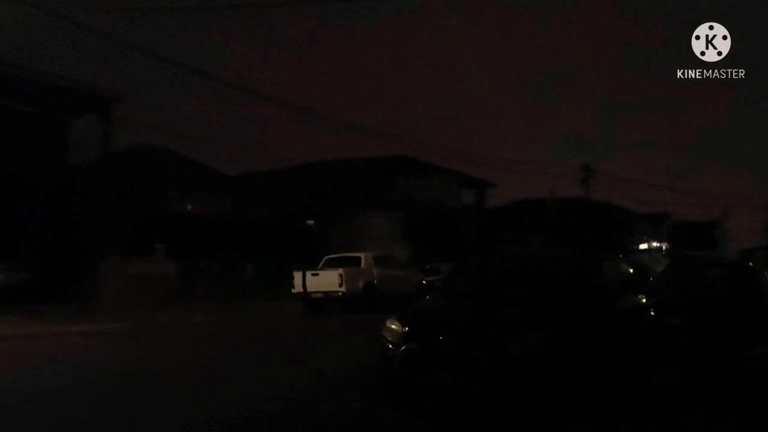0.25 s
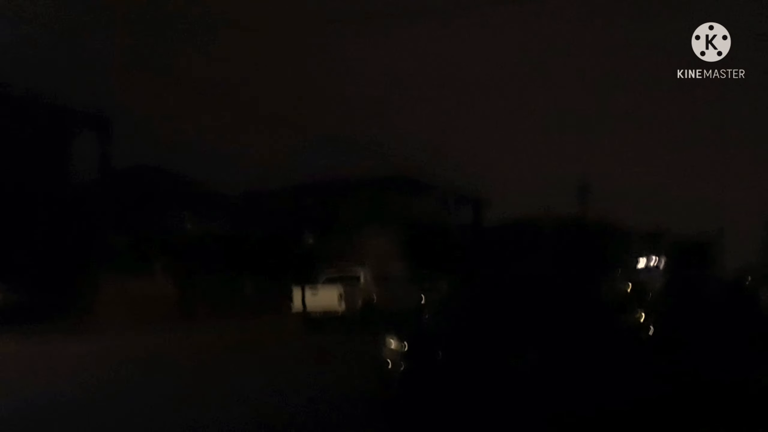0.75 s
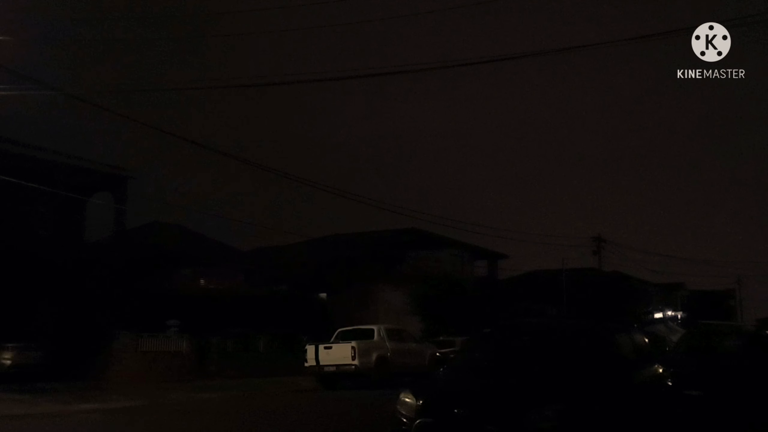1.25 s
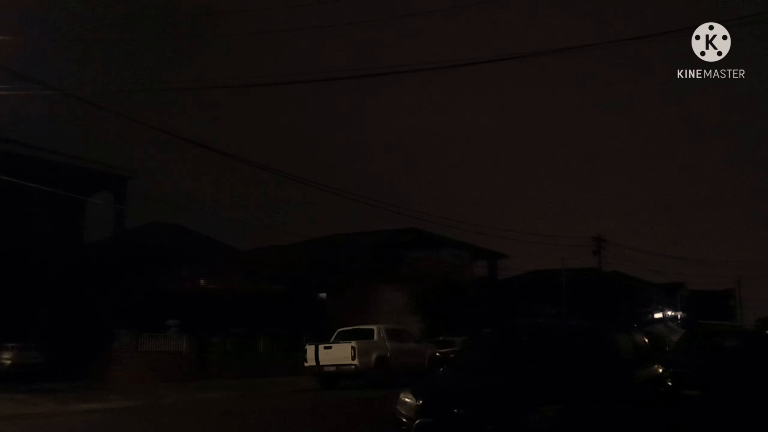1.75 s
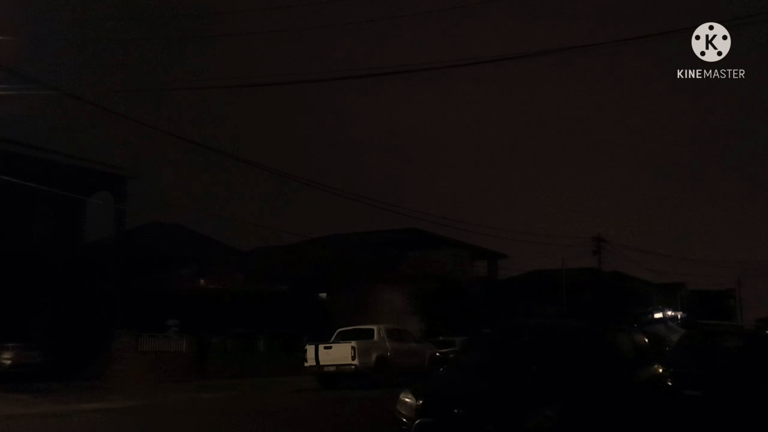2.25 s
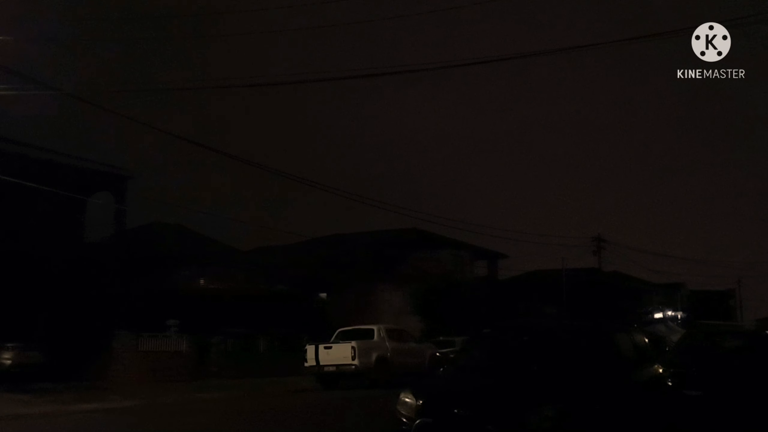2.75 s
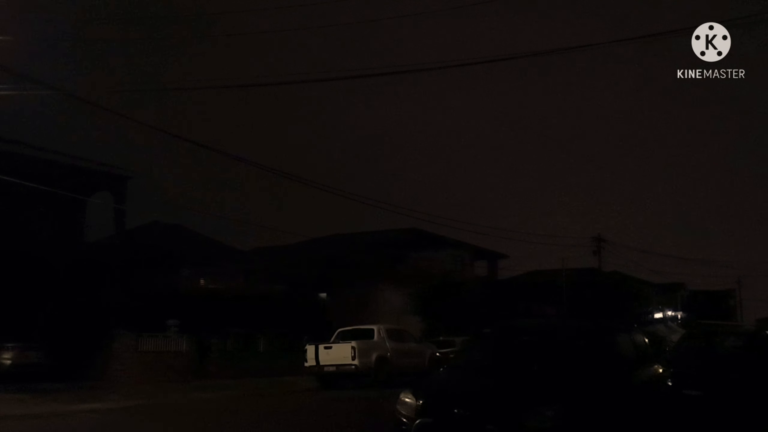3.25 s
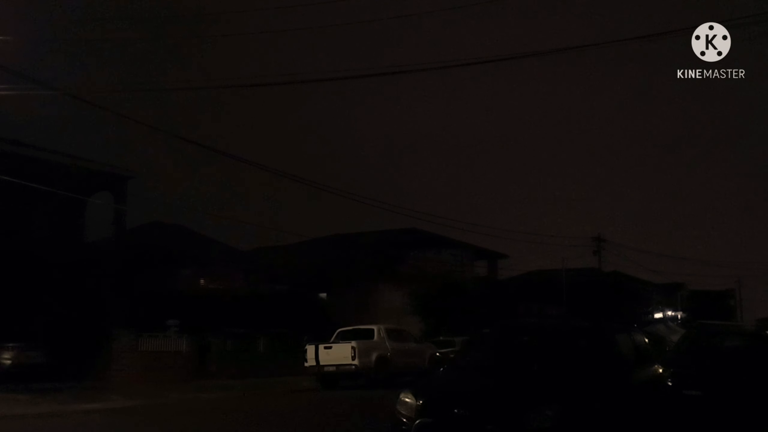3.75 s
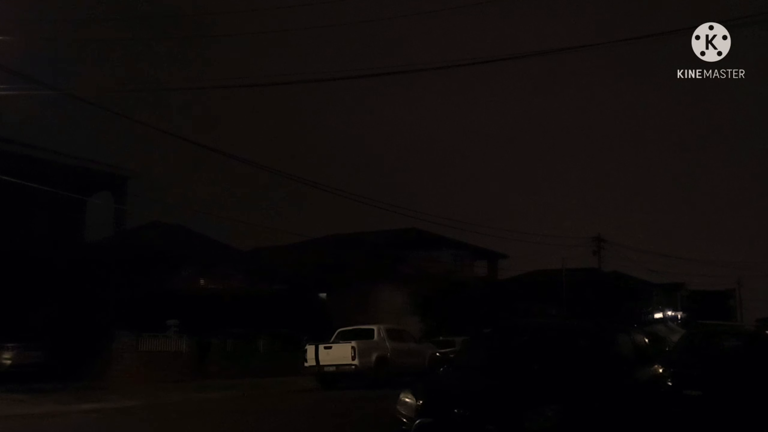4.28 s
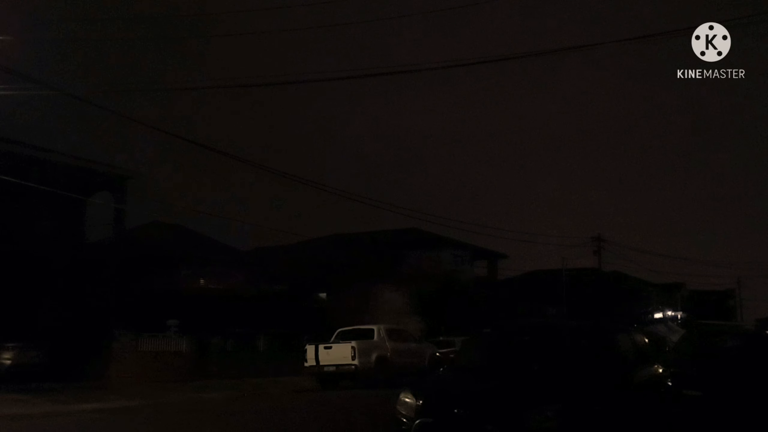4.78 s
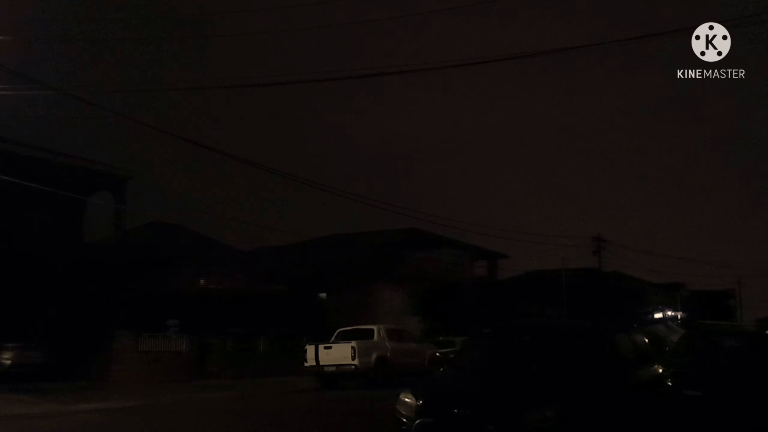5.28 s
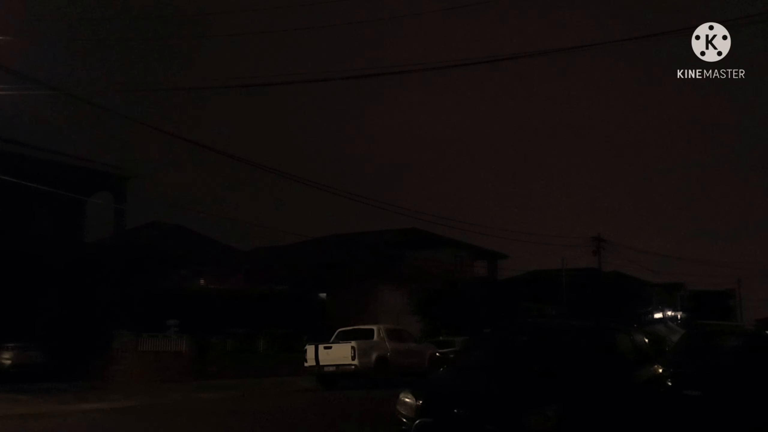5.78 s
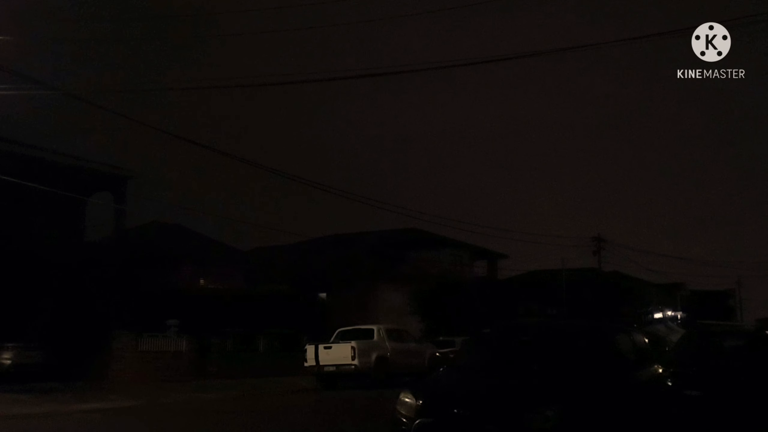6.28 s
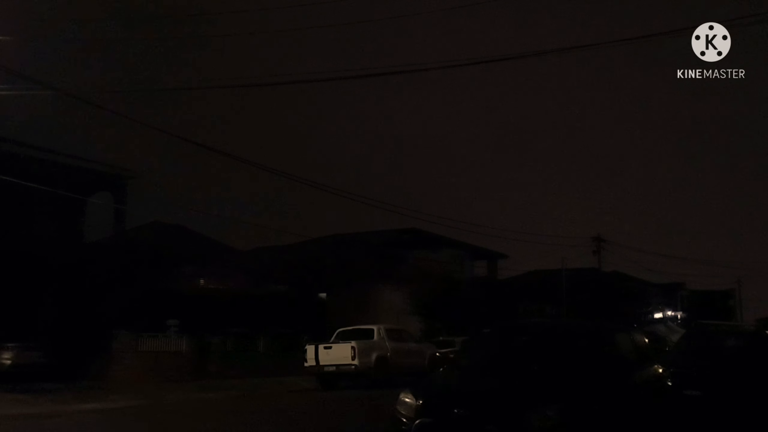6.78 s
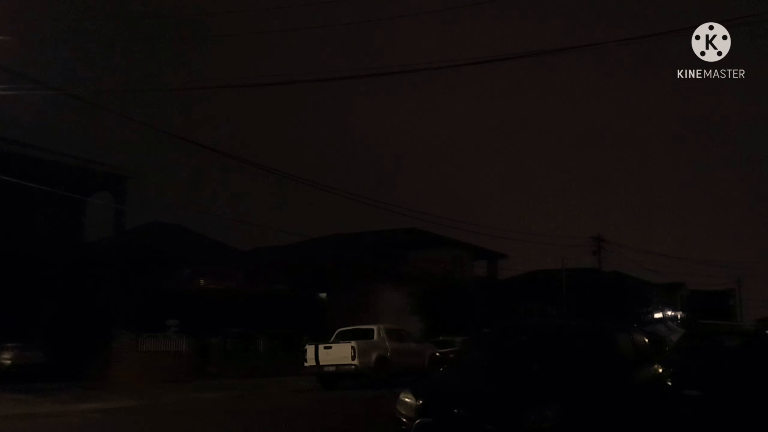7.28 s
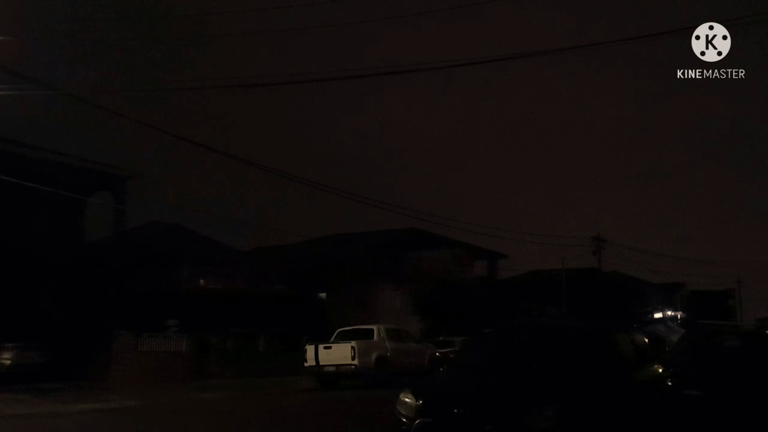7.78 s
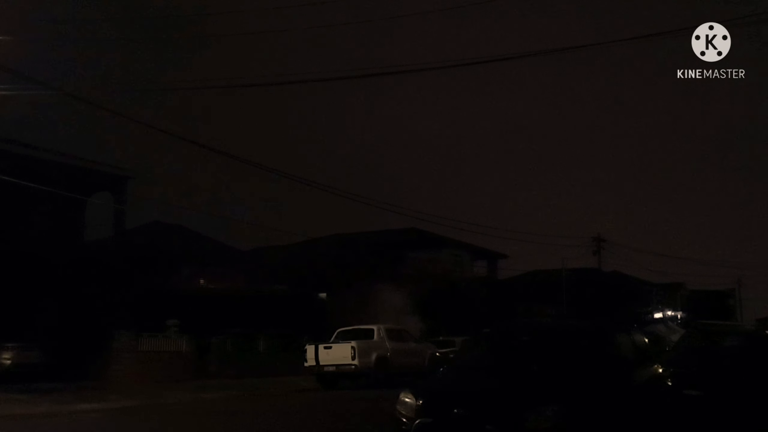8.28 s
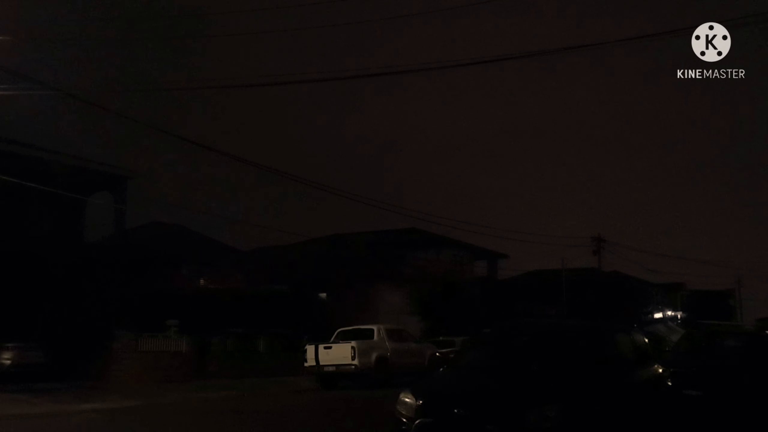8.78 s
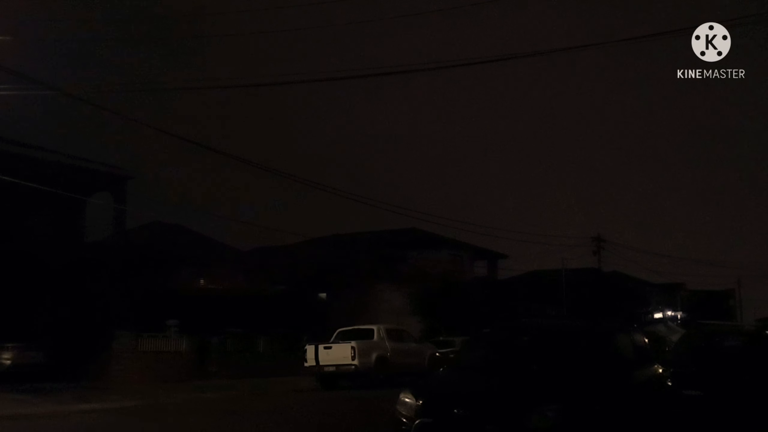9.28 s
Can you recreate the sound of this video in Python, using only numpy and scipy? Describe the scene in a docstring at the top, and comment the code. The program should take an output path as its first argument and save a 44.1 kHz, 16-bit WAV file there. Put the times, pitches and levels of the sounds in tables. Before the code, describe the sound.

Rain knocks and patters on a parked car's roof and glass, heard from inside, as distant thunder swells, rumbles heavily and fades.

```python
"""Rain on a parked car at night, heard from inside: large drops ring the panels of roof and windscreen, small
ones patter between them, and the cabin throws each knock back. Far thunder is shaped noise that swells, claps
and sets the cabin air booming near 300 Hz; dull blows ring that air too. Outside, finer rain is a wide hiss
with short bright swishes, and a faint insect chirps early on. Patter and hiss step up after the first second."""
import sys
import numpy as np
from scipy import signal
from scipy.fft import rfft, irfft, next_fast_len
from scipy.io import wavfile
from scipy.ndimage import uniform_filter1d

SR = 44100
rng = np.random.default_rng(int(sys.argv[2]) if len(sys.argv) > 2 else 0)


def unload_audio(sound):
    """Save the sound as a 16-bit wav file, at the path given as the first command line argument."""
    columns = np.transpose(np.atleast_2d(sound))
    # keep every value between -1 and 1, then stretch to whole-number steps
    steps = np.round(np.clip(columns, -1, 1) * 32767)
    wavfile.write(sys.argv[1], SR, steps.astype(np.int16))


def boost_factor(decibels):
    """Convert a level in decibels to a linear amplitude factor."""
    exponent = np.asarray(decibels, float) / 20
    return 10 ** exponent


N = 420273  # samples

# large drops on the roof, dull: start_s, knock_level_db
ROOF_DROPS = [(0.014, -37), (0.0329, -25), (0.069, -39), (0.081, -30.5), (0.09, -35), (0.105, -37),
              (0.1335, -37), (0.148, -32), (0.192, -35), (0.213, -39), (0.378, -25), (0.447, -38),
              (0.518, -28.5), (0.6171, -30.5), (0.773, -37.5), (0.824, -38), (0.9668, -33), (0.9886, -28),
              (1.092, -34.5), (1.109, -32), (1.1237, -32), (1.158, -32), (1.178, -37), (1.325, -30.5),
              (1.3831, -26.5), (1.404, -35), (1.436, -27), (1.6982, -35), (1.9222, -17), (2.087, -13.5),
              (2.1338, -14), (2.1508, -23.5), (2.1697, -25), (2.303, -29.5), (2.467, -24.5), (2.4864, -24),
              (2.6024, -27), (2.8645, -23), (2.8706, -19.5), (3.113, -49), (3.1304, -26.5), (3.233, -18),
              (3.272, -29), (3.334, -30), (3.4739, -22.5), (3.546, -28.5), (3.61, -31.5), (3.6682, -18.5),
              (3.746, -28.5), (3.762, -26), (3.855, -24), (3.9263, -24), (4.023, -28.5), (4.04, -31),
              (4.063, -27), (4.098, -34), (4.134, -24.5), (4.429, -31), (4.443, -30), (4.6446, -25.5),
              (4.729, -26), (4.8813, -19.5), (5.345, -36), (5.4313, -27.5), (5.8251, -20), (5.855, -13),
              (5.8826, -15), (6.1168, -16.5), (6.1862, -20), (6.2537, -22), (6.31, -29), (6.69, -22.5),
              (6.8001, -16.5), (7.346, -25), (7.374, -20.5), (7.4199, -22.5), (7.7575, -20.5), (8.116, -15),
              (8.1361, -15), (8.176, -20), (8.283, -34), (8.337, -27), (8.461, -31.5), (8.588, -35),
              (8.74, -28), (8.8863, -25), (9.1358, -37), (9.1929, -32), (9.298, -33), (9.3098, -22),
              (9.328, -26.5), (9.3792, -28), (9.4569, -27), (9.483, -20)]
# large drops on the glass, with a bright splash: start_s, knock_level_db
GLASS_DROPS = [(0.692, -31), (1.447, -28), (1.4724, -22), (1.6624, -31.5), (1.7756, -29), (1.9052, -27.5),
               (2.0692, -22.5), (2.2024, -23), (2.345, -26.5), (2.384, -24.5), (2.494, -24),
               (2.5227, -17.5), (2.8109, -25.5), (2.9484, -16.5), (3.877, -19.5), (4.279, -20), (4.33, -24),
               (4.5288, -20), (4.7596, -24.5), (4.856, -27.5), (5.017, -34), (5.402, -23.5),
               (5.9803, -22.5), (6.149, -24.5), (6.373, -28), (6.515, -27.5), (6.532, -20.5), (6.9216, -23),
               (7.0494, -25), (7.0729, -28), (8.6254, -23.5), (8.9129, -23.5)]
# level of small drops and hiss: time_s, level_db
RAIN_LEVEL = [(.1, -10), (.35, -12), (1.29, -8.5), (1.38, -0.5), (3.3, -0.5), (6.4, 2.5), (7.9, 2.5),
              (9.5, 0)]
# claps that stand out of the roll: crest_s, rumble_db, cabin_boom_db
THUNDER_CLAPS = [(3.239, -42, -38.5), (3.693, -42.5, -46), (4.9, -35, -28), (5.661, -26, -41.5),
                 (5.894, -29, -27), (6.271, -35, -27.5), (6.55, -20.5, -21.5), (6.771, -29.5, -44),
                 (7.269, -23.5, -24), (7.609, -24, -28), (8.242, -25.5, -28), (9.231, -36.5, -35)]
# cabin air modes: pitch_hz, width_hz (of one filter pass), level_db
CABIN_MODES = [(277, 79, -2.5), (306.1, 59.4, 0), (448.6, 67, -7), (613, 77, -17)]


def curve(table, column):
    """One column of a table, sample by sample."""
    rows = np.array(table)
    return np.interp(np.arange(N) / SR, rows[:, 0], rows[:, column])


def colour(x, points):
    """Filter by a spectrum of (Hz, dB) points; rms 1."""
    hz, db = np.transpose(points)
    size = next_fast_len(N)
    bin_hz = np.arange(size // 2 + 1) * SR / size
    gain = boost_factor(np.interp(np.log(bin_hz + 1), np.log(hz), db))
    y = irfft(rfft(x, size) * gain, size)[..., :N]
    return y / np.sqrt(np.mean(y ** 2))


def band(x, low_hz, high_hz):
    """Gentle band-pass."""
    return signal.sosfilt(signal.butter(2, [low_hz, high_hz], "band", fs=SR, output="sos"), x)


def walk(rate):
    """Random levels held 1 / rate s and slewed twice; spread near 1."""
    hold = int(SR / rate)
    held = np.repeat(rng.standard_normal(N // hold + 1), hold)
    return 1.3 * uniform_filter1d(uniform_filter1d(held, hold), hold)[:N]


def knocks(drops, splash_db):
    """Each drop rings the panel modes, throws a short bright splash and leaves its own brief blur in each ear."""
    # panel modes, before each drop's tilt and scatter: pitch_hz, level_db, t60_s
    panel = [(338, 9.5, 0.034), (593, 4, 0.01), (842, 7, 0.011), (1288, 3.5, 0.011), (1960, 0.5, 0.0083),
             (2940, 10.5, 0.00048)]
    length = 2048  # samples per knock
    s, db = np.transpose(drops)[:, :, None, None]
    lag, stretch, stiff, wet = rng.random((len(drops), 4)).T
    splash_db = splash_db + 10 * (wet[:, None, None] - .5)
    # dB per octave: knocks with more splash ring brighter
    tilt_db = 4.5 + 0.12 * splash_db.ravel() + 3.3 * (stiff - .5)
    lag_us = (-100 + 330 * lag)[:, None, None]  # most spots lie nearer the right ear
    detune, scatter = np.moveaxis(rng.standard_normal((len(drops), len(panel), 2)), 2, 0)
    spray, blur = np.moveaxis(rng.standard_normal((len(drops), 2, 2, length)), 1, 0)

    start = np.maximum((s * SR).astype(int) - 32, 0)
    ear_lag = np.array([[-1], [1]]) * lag_us / 2e6
    # the touch comes .2 ms ahead of the listed time
    t = np.maximum((np.arange(length) + start) / SR - s + .0002 + ear_lag, 0).astype(np.float32)
    ring = 0
    for k, (hz, mode_db, t60) in enumerate(panel):
        turn = (2 * np.pi * hz * (1 + .14 * detune[:, k, None, None])).astype(np.float32)
        strength = boost_factor(mode_db + tilt_db * np.log2(hz / 1000) + 3 * scatter[:, k])[:, None, None]
        decay = np.exp(t * np.float32(-np.log(1000) / t60))
        ring = ring + strength * np.sin(turn * t) * decay
    # a small patch of panel radiates its slow dent poorly, so the crest swings back; water lands softly
    ring = band(ring, 462, 8600)
    ring = ring / ring.max(axis=(1, 2), keepdims=True)

    splash_fade = np.exp(-t / 0.0003) + boost_factor(-25) * np.exp(-t / 0.02)
    splash = band(spray * (t > 0) * splash_fade, 2500, 13000)
    splash = splash / np.abs(splash).max(axis=(1, 2), keepdims=True)
    tail = boost_factor(-14.5) * band(blur * (t > 0) * 1000 ** (-t / 0.11), 240, 2450)

    knock = boost_factor(db) * (ring + boost_factor(splash_db) * splash + tail)
    out = np.zeros((2, N + 2 * length))
    for at, one, spot in zip(start.ravel(), knock, stretch):
        out[:, at:at + length] += cabin(one, .97 + .06 * spot)
    return out[:, :N] * boost_factor(np.array([[.6], [-.6]]))


def cabin(knock, stretch):
    """Hard surfaces throw a knock back, a little sooner or later for every spot."""
    # near glass, then far end of the cabin: delay_ms (before stretch), level_db
    echoes = [(1.8, -9), (6.9, -9)]
    out = knock
    for ms, db in echoes:
        out = out + boost_factor(db) * np.roll(knock, int(ms * stretch * SR / 1000), axis=1)
    return out


def patter():
    """Times and levels of small drops: random moments, thickest round the large drops."""
    per_s, base_db, spread_db = 80, -44, 5
    flurry_s, lull_share = .06, .45  # reach of a flurry round a large drop; weight left in the lulls
    count = int(per_s * N / SR)
    when, size = rng.random((count, 2)).T
    t = np.linspace(0, N / SR, num=2000)
    near = sum(np.exp(-((t - drop[0]) / flurry_s) ** 2) for drop in ROOF_DROPS + GLASS_DROPS)
    flurry = np.cumsum(lull_share + near)
    s = np.interp(when * flurry[-1], flurry, t)
    # each drop lies 0 to 6 dB above the base
    db = base_db + np.interp(s, *np.transpose(RAIN_LEVEL)) - spread_db * np.log(size).clip(-1.2)
    return np.transpose([s, db])


def thunder():
    """Countless shocks from a long crooked channel overlap into a lumpy rumble that sets the cabin air booming."""
    # spectrum of the rumble: pitch_hz, relative_level_db
    rumble_spectrum = [(28, -62), (50, -3), (75, -1.5), (130, -5), (230, -7.5), (300, -88)]
    mid, side = rng.standard_normal((2, N))
    # the longest waves reach both ears alike
    apart = .25 * band(side, 110, 2000) + .25 * band(side, 400, 2000)
    shocks = (mid + apart * np.array([[1], [-1]])) * boost_factor(1.2 * walk(25))
    rumble = colour(shocks, rumble_spectrum)

    uneven = shocks * boost_factor(1.6 * walk(16))
    boom = 0
    for hz, width, db in CABIN_MODES:
        b, a = signal.iirpeak(hz, hz / width, SR)
        boom = boom + boost_factor(db) * signal.lfilter(b, a, signal.lfilter(b, a, uneven))
    # miles of air have taken off everything above the upper boom
    boom = band(band(boom, 120, 860), 120, 860)
    boom = boom / np.sqrt(np.mean(boom ** 2))
    return roll(column=1) * rumble + roll(column=2) * boom + thumps()


def roll(column):
    """Strength of the thunder: the slow swell plus claps that rise fast and die away."""
    # slow swell: time_s, rumble_db, cabin_boom_db
    swell = [(0.0, -55.5, -66.5), (1.25, -57, -65.5), (1.7, -51, -57), (2.1, -37.5, -39.5),
             (2.4, -49, -52.5), (2.7, -44, -38.5), (3.05, -47.5, -46.5), (3.55, -50, -54.5),
             (3.9, -38.5, -38), (4.75, -37, -35), (5.55, -31, -30.5), (5.77, -39, -36), (6.1, -27, -24.5),
             (6.9, -29.5, -29.5), (8.1, -29, -31.5), (8.75, -32, -36), (9.1, -39, -45), (9.52, -46.5, -49)]
    rise_s, t60_s = 0.037, 0.44
    t = np.arange(N) / SR
    power = boost_factor(curve(swell, column=column)) ** 2
    for clap in THUNDER_CLAPS:
        late = t - clap[0]
        rise = np.exp(-(late / rise_s) ** 2)
        fall = 1e6 ** (-np.maximum(late, 0) / t60_s)
        power = power + boost_factor(clap[column]) ** 2 * np.where(late < 0, rise, fall)
    return np.sqrt(power)


def thumps():
    """Front shock of each clap: one long pressure swing about its crest, of its own length."""
    above_rumble_db, middle_hz = 7.5, 80.5
    t, out = np.arange(N) / SR, 0
    for (s, db, _), size in zip(THUNDER_CLAPS, rng.standard_normal(len(THUNDER_CLAPS))):
        turns = (t - s) * middle_hz * (1 + 0.1 * size)
        out = out + boost_factor(db + above_rumble_db) * np.sin(2 * np.pi * turns) * np.exp(-turns ** 2)
    return out


def blows():
    """Short dull blows ring the cabin mode near 306 Hz, never quite on the same note."""
    # blows: start_s, level_db (before rise and decay)
    dull_blows = [(1.925, -24), (1.944, -23), (2.068, -19.5), (2.14, -23.5), (2.157, -24), (4.212, -20.5),
                  (4.277, -16), (4.3, -29), (4.869, -22)]
    rise_s, t60_s = 0.0036, 0.094
    s, db = np.transpose(dull_blows)[:, :, None]
    t = np.maximum(np.arange(N) / SR - s, 0)
    hz = CABIN_MODES[1][0] * (1 + .04 * rng.standard_normal((len(dull_blows), 1)))
    envelope = np.tanh(t / rise_s) * 1000 ** (-t / t60_s)
    return np.sum(boost_factor(db) * envelope * np.sin(2 * np.pi * hz * t), axis=0)


def hiss():
    """Rain on road and leaves: noise unrelated in the two ears, swelling a little, with short bright swishes."""
    # spectrum of the hiss: pitch_hz, relative_level_db
    hiss_spectrum = [(470, 4.5), (800, -1.5), (2180, -7), (3540, -7.5), (5140, -7.5), (5750, -5.5),
                     (8300, -13), (9400, -21.5), (10800, -15.5), (14000, -15), (15500, -15)]
    # bright bursts: start_s, level_db (against the hiss, before flicker), t60_s
    bursts = [(1.433, 9.5, 0.25), (3.166, 24, 0.17), (8.117, 10, 0.087)]
    rain = colour(rng.standard_normal((2, N)), hiss_spectrum)
    start, db, t60 = np.transpose(bursts)[:, :, None]
    t = np.maximum(np.arange(N) / SR - start, 0)
    swish = np.sum(boost_factor(db) * np.tanh(t / .002) * 1000 ** (-t / t60), axis=0)
    sway_db = 1.3 * walk(5) + .9 * walk(20) + 1.6 * walk(300)
    loudness = boost_factor(-53.5 + curve(RAIN_LEVEL, column=1) + sway_db)
    flicker = boost_factor(2.5 * walk(600))
    return loudness * (rain + swish * flicker * band(rain, 900, 9000))


def insect():
    """A faint insect: short soft-edged notes on one pitch."""
    # middle of each chirp: time_s
    chirps = [.563, .637, .745, .83]
    pitch_hz, reach_s, level_db = 5940, 0.012, -70
    t = np.arange(N) / SR
    notes = sum(np.exp(-((t - s) / reach_s) ** 2) for s in chirps)
    return boost_factor(level_db) * np.sin(2 * np.pi * pitch_hz * t) * notes


def scene():
    """Large and small drops on the car, thunder and blows, the hiss outside and the insect."""
    roof = knocks(ROOF_DROPS, splash_db=-26)
    glass = knocks(GLASS_DROPS, splash_db=-13)
    small = knocks(patter(), splash_db=-14.5)
    return roof + glass + small + thunder() + blows() + hiss() + insect()


def low_pass(x):
    """Removes everything above the highest recorded frequency."""
    return signal.sosfilt(signal.butter(12, 16660, fs=SR, output="sos"), x)


def record(dry):
    """The left microphone is brighter at the top, duller at 3 to 6 kHz; both are cut above 15.95 kHz."""
    bright = band(dry[0], 7500, 15000)
    left = boost_factor(-.2) * dry[0] + .95 * bright - .65 * band(dry[0], 3000, 6000)
    mix = np.array([left, dry[1]])
    mix = signal.sosfilt(signal.ellip(8, .2, 60, 15950, fs=SR, output="sos"), mix)
    return low_pass(mix)


dry = scene()
out = record(dry)
unload_audio(out)
```